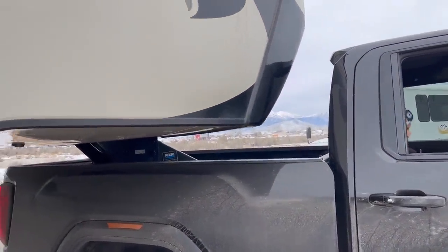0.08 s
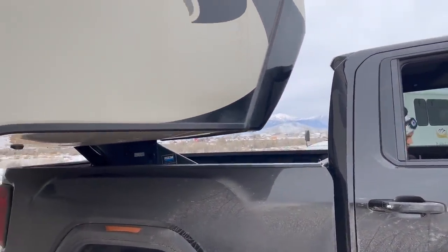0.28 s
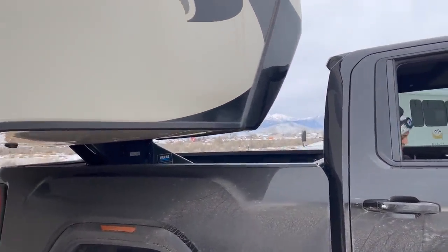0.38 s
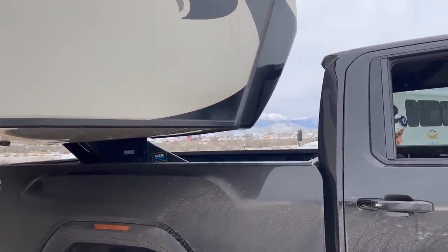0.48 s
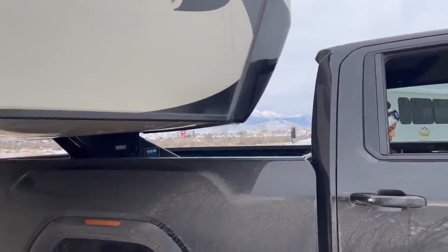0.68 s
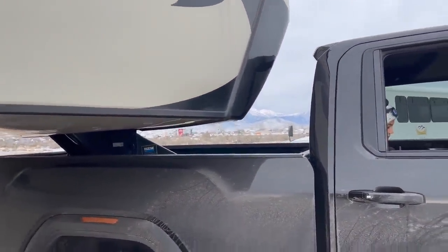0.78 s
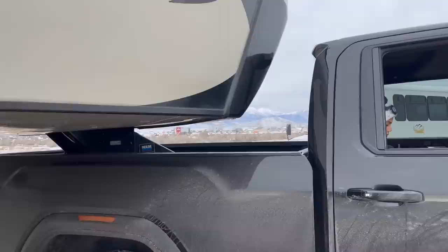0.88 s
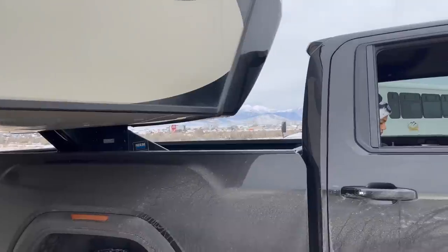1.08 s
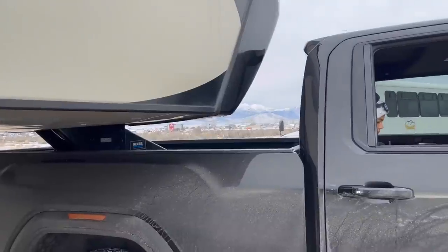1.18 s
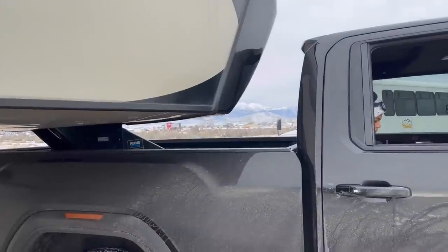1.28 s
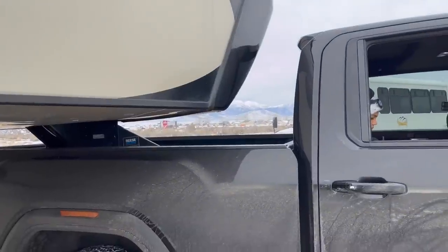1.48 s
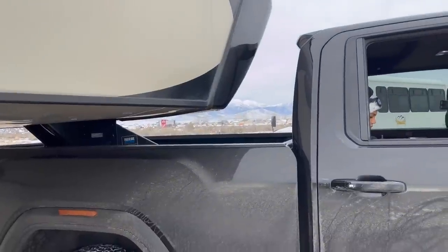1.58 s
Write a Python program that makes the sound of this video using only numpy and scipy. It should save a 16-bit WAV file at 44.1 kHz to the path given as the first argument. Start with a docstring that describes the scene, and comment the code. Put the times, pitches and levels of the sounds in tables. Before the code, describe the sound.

A diesel pickup idles close by outdoors, clattering and droning with dull regular knocks. Early on the trailer hitch clunks hard, then again more softly, booming through the truck bed; stereo phone a few metres away.

```python
"""An eight-cylinder diesel pickup creeps at idle a few metres from a phone, outdoors.
From the start the exhaust drones (wavering sines over low noise) and each firing clatters (noise bursts
over steady hiss). A loose part knocks twice per engine cycle (short damped sines). Then the trailer hitch
clunks twice, each a pair of contacts (ringing steel modes, rattle, sizzle). Each clunk booms through the
truck bed (low damped sines), echoes off the yard and leaves the trailer shuddering (low noise). Near
0.93 s the bed gives a soft third bump."""
import sys
import numpy as np
from scipy import signal
from scipy.fft import rfft, irfft, next_fast_len
from scipy.io import wavfile
from scipy.ndimage import map_coordinates

SR = 44100
rng = np.random.default_rng(int(sys.argv[2]) if len(sys.argv) > 2 else 0)


def to_wav(sig):
    """Store sig (one row per channel, or 1-D mono) as 16-bit WAV at the path in sys.argv[1].

    Samples outside -1..1 are clipped; the rate is SR.
    """
    pcm = np.clip(np.atleast_2d(sig), -1, 1) * 32767
    pcm = np.round(pcm).astype(np.int16)
    wavfile.write(sys.argv[1], SR, pcm.T)  # frames by channels


def volts_from_db(level):
    """Convert decibel levels to linear amplitude ratios."""
    exponent = np.asarray(level, float) / 20
    return 10 ** exponent


N = 72765  # samples, 1.65 s
CYCLE_HZ = 5.005  # engine cycles a second, each two crank turns


def unit(x):
    """Scale to rms 1."""
    return x / np.sqrt(np.mean(x ** 2) + 1e-20)


def along(points, hz):
    """Read a curve of (Hz, value) points on a log frequency axis."""
    f, v = np.transpose(points)
    return np.interp(np.log(hz + 1), np.log(f + 1), v)


def wobble(rate):
    """A smooth random curve with rate knots a second."""
    return map_coordinates(rng.standard_normal(100), [np.arange(N) * rate / SR])


def filtered(x, response):
    """Multiply the spectrum of x by a complex response of frequency."""
    size = next_fast_len(N + SR // 2)
    hz = np.fft.rfftfreq(size, 1 / SR)
    return irfft(rfft(x, size) * response(hz), size)[..., :N]


def noise(spectrum):
    """Two unrelated noises of one colour, rms 1."""
    return unit(filtered(rng.standard_normal((2, N)), lambda hz: volts_from_db(along(spectrum, hz))))


def firm(sound):
    """A pair whose second half is silent: a tone or ring reaches both ports alike."""
    return np.stack([sound, np.zeros_like(sound)])


def add(track, s, sound):
    """Mix a sound into a track from s seconds on."""
    part = track[..., max(round(s * SR), 0):][..., :sound.shape[-1]]
    part += sound[..., :part.shape[-1]]


def dying(t60, rise):
    """Half a second of times, and an envelope that rises and then decays."""
    t = np.arange(SR // 2) / SR
    return t, volts_from_db(-60 * t / t60) * (1 - np.exp(-t / rise))


# exhaust tones [f/Hz, level/dB rms before wavering, waver/dB]
EXHAUST_TONES = [(40.1, -49, 2), (94.8, -50, 3), (120.2, -50, 2.5), (200.3, -58, 3), (400.4, -59, 1.2)]
# swell of the drone and the whine [t/s, drone level/dB rms, whine level/dB rms before wavering]
DRONE_SWELL = [(0, -39.5, -59), (.13, -44.5, -57), (.4, -45, -55), (.8, -40.5, -51), (.88, -42, -54),
               (1.0, -32, -52), (1.11, -45, -55), (1.22, -34, -45), (1.32, -41, -50.5), (1.45, -36, -50),
               (1.65, -45.5, -50)]
# colour of the exhaust rumble [f/Hz, relative level/dB per Hz]
RUMBLE_COLOUR = [(12, -66), (20, -6), (70, -8), (122, -4.5), (167, -15), (248, -14), (349, -19.5),
                 (397, -14.5), (499, -35), (600, -16.5), (780, -65), (1320, -120)]


def exhaust():
    """Gas pulses sound as wavering tones, a swelling drone and a faint whine over a low rumble."""
    drone_hz, whine_hz = 61, 837.4
    rumble_db, rumble_waver_db = -43.5, 1.8
    t = np.arange(N) / SR

    def tone(hz, db, blur):  # blur: phase wander in radians
        phase = 2 * np.pi * (hz * t + rng.random()) + blur * wobble(11.6)
        return volts_from_db(db) * np.sqrt(2) * np.sin(phase)

    s, drone_db, whine_db = np.transpose(DRONE_SWELL)
    tones = sum(tone(hz, db + waver_db * wobble(9), 0.71) for hz, db, waver_db in EXHAUST_TONES)
    drone = tone(drone_hz, np.interp(t, s, drone_db), 0.11)
    whine = tone(whine_hz, np.interp(t, s, whine_db) + 4.6 * wobble(25.45), 1.04)
    rumble = volts_from_db(rumble_db + rumble_waver_db * wobble(13.66)) * noise(RUMBLE_COLOUR)
    return firm(tones + drone + whine) + rumble


# how hard each cylinder strikes, in firing order [level/dB before scatter]
CYLINDER_LEVELS = [3.4, 0.24, 1.3, -1.2, -4.3, 2.3, 4.3, -1.7]
# colour of the broad clatter [f/Hz, relative level/dB per Hz]
CLATTER_COLOUR = [(250, -45), (420, -9.5), (510, -16), (620, -7), (900, -0.5), (1100, -0.5), (1500, 0.5),
                  (2100, -8.5), (2900, -11), (4200, -19.5), (6000, -25.5), (7300, -31), (8000, -34.5),
                  (8700, -29.5), (10000, -28), (11300, -29), (13000, -35), (14000, -28), (14700, -39),
                  (15100, -54), (16000, -100)]
# gain of the clatter above 3.5 kHz, before its flicker [t/s, level/dB]
TREBLE_GAIN = [(0, 1.6), (.45, 1.4), (.8, -0.1), (1.65, -0.2)]
# resonances of the engine block [f/Hz, bandwidth/Hz, relative level/dB]
BLOCK_MODES = [(697, 32, -8.5), (823, 30, -4), (1014, 45, -5), (1061, 35, 3.5), (1180, 37, -5),
               (1408, 27, -3), (1663, 110, -9.5), (2080, 86, -7)]


def clatter():
    """Each firing sets off a dying noise burst, broad and through the block's modes, over steady hiss."""
    first_firing_s, jitter_s, scatter_db = 0.0072, 0.0016, 2.2
    burst_t60_s, burst_rise_s, steady_share = 0.051, 0.001, 0.75
    broad_db, block_db, flicker_db = -40, -45.5, 1.47

    firing = np.arange(int(N / SR * CYCLE_HZ * 8) + 1)
    chance = rng.standard_normal((len(firing), 2))
    at = first_firing_s + firing / CYCLE_HZ / 8 + jitter_s * chance[:, 0]
    strength_db = np.resize(CYLINDER_LEVELS, len(firing)) + scatter_db * chance[:, 1]
    blows = np.bincount((np.abs(at) * SR).astype(int), volts_from_db(strength_db), N + SR)

    t = np.arange(SR // 10) / SR
    burst = volts_from_db(-60 * t / burst_t60_s) * (1 - np.exp(-t / burst_rise_s))
    bursts = unit(signal.fftconvolve(blows, burst)[:N])
    envelope = steady_share + (1 - steady_share) * bursts
    excite = envelope * rng.standard_normal((2, 2, N))

    broad = unit(filtered(excite[0], lambda hz: volts_from_db(along(CLATTER_COLOUR, hz))))
    treble = filtered(broad, lambda hz: hz > 3500)
    treble_db = np.interp(np.arange(N) / SR, *np.transpose(TREBLE_GAIN)) + flicker_db * wobble(15.6)
    broad = broad + treble * (volts_from_db(treble_db) - 1)

    def block_response(f):
        modes = sum(volts_from_db(db) * 1j * f * width / (centre ** 2 - f ** 2 + 1j * f * width)
                    for centre, width, db in BLOCK_MODES)
        return modes * np.exp(-f / 3000)

    block = unit(filtered(excite[1], block_response))
    return volts_from_db(broad_db) * broad + volts_from_db(block_db) * block


# the knocks of one cycle [t/s into the cycle, level/dB before scatter]
KNOCK_TIMES = [(.092, -30.5), (0.149, -33.5)]
# modes of the loose part [f/Hz, relative level/dB before scatter, t60/s]
LOOSE_PART_MODES = [(200, 4.5, 0.033), (247.2, 0.5, 0.059), (302.6, -7.5, 0.077)]


def knocks():
    """A loose part is struck at the same two points of each cycle and rings dull and hollow."""
    scatter_db, rise_s = 1.3, 0.0052
    out = np.zeros(N)
    t = np.arange(SR // 8) / SR
    for cycle in range(9):
        for s, db in KNOCK_TIMES:
            chance_db = scatter_db * rng.standard_normal(4)  # the whole knock, then its modes at half
            ring = sum(volts_from_db(level + chance_db[m + 1] / 2 - 60 * t / t60) * np.sin(2 * np.pi * hz * t)
                       for m, (hz, level, t60) in enumerate(LOOSE_PART_MODES))
            knock = volts_from_db(db + chance_db[0]) * ring * (1 - np.exp(-t / rise_s))
            add(out, s + cycle / CYCLE_HZ, knock)
    return out


# hitch contacts [t/s, steel level/dB, centre of the struck pitch f/Hz, narrowness/dB per octave squared,
# sizzle level/dB before its envelope]
HITCH_CONTACTS = [(.2345, -8, 1270, 5.5, -36), (.257, -17, 1220, 3.5, -55), (.602, -19, 1180, 31, -43),
                  (0.62, -13.5, 735, 74, -44)]
# steel modes of the hitch [f/Hz, relative level/dB, t60/s]
STEEL_MODES = [(551.4, -8, 0.12), (662, -10, 0.055), (735, -13.5, 0.069), (959, -7.5, 0.064),
               (1043, -7, 0.069), (1000, 3, 0.046), (1103, -6, 0.071), (1208, -23, 0.059),
               (1248, -6.5, 0.12), (1500, -31, 0.066), (1651, -2.5, 0.061), (1905, -12.5, 0.073),
               (1962, -13, 0.064), (2470, -28, 0.051)]
# colour of the rattle before the strike shapes it [f/Hz, relative level/dB per Hz]
RATTLE_COLOUR = [(150, -30), (300, 0), (600, 0.5), (1100, 6.5), (2200, -6.5), (3000, -13), (5000, -8)]
# colour of the sizzle [f/Hz, relative level/dB per Hz]
SIZZLE_COLOUR = [(2000, -27), (3200, 1), (4800, 1.5), (6500, -4), (8000, -10), (9500, -2.5), (11500, -4),
                 (13300, -18), (13900, -43)]


def hitch():
    """Each contact rings the steel modes near where it is struck, with a rattle and a fine sizzle."""
    steel_rise_s = 0.0019
    rattle_db, rattle_t60_s, rattle_rise_s = -3.5, 0.15, 0.0011
    sizzle_t60_s, sizzle_rise_s = 0.12, 0.015
    out = np.zeros((2, N))
    for s, steel_db, struck_hz, narrow_db, sizzle_db in HITCH_CONTACTS:

        def struck_db(hz):
            return steel_db - narrow_db * np.log2((hz + 1) / struck_hz) ** 2

        for hz, db, t60 in STEEL_MODES:
            t, shape = dying(t60, steel_rise_s)
            add(out, s, firm(volts_from_db(db + struck_db(hz)) * shape * np.sin(2 * np.pi * hz * t)))
        rattle = filtered(noise(RATTLE_COLOUR), lambda hz: volts_from_db(rattle_db + struck_db(hz)))[:, :SR // 2]
        add(out, s, rattle * dying(rattle_t60_s, rattle_rise_s)[1])
        sizzle = volts_from_db(sizzle_db) * noise(SIZZLE_COLOUR)[:, :SR // 2]
        add(out, s, sizzle * dying(sizzle_t60_s, sizzle_rise_s)[1])
    return out


# low damped swings of the bed and frame: after the two clunks, and in a soft third bump near 0.93 s
# [t/s, level/dB, f/Hz, rise/s, t60/s]
BED_SWINGS = [(0.2354, -10.5, 268.2, 0.0065, 0.093), (0.2386, -18.5, 211.7, 0.0032, 0.21),
              (0.2376, -24.5, 398, 0.0021, .14), (0.251, -2, 118.3, .006, .1),
              (0.2774, -4, 61, 0.0036, 0.1), (0.3169, -12.5, 86.7, 0.0078, 0.13),
              (.3715, -20.5, 54, 0.012, 0.24), (0.6039, -18.5, 218.7, 0.0036, 0.16),
              (.604, -25, 373, 0.001, 0.095), (0.608, -31, 292.5, 0.0031, 0.22),
              (0.6258, -10, 104, 0.0022, 0.062), (0.649, -12, 54.8, 0.0079, 0.24),
              (.652, -23.5, 125.5, 0.0033, 0.26), (.735, -29, 135, 0.0073, 0.16),
              (0.928, -26.5, 223, 0.0053, 0.12), (.935, -31.5, 277.6, .01, 0.13)]


def bed():
    """The bed and frame swing low and damped after the two clunks, and in a soft bump near 0.93 s."""
    out = np.zeros(N)
    for s, db, hz, rise, t60 in BED_SWINGS:
        t, shape = dying(t60, rise)
        add(out, s, volts_from_db(db) * shape * np.sin(2 * np.pi * hz * t))
    return out


# decay of the yard's echoes [f/Hz, t60/s]
YARD_DECAY = [(100, 0.65), (1000, 0.15), (8000, 0.25)]


def yard(x):
    """Echoes off ground and vehicles: a noise tail in which each frequency dies at its own speed."""
    hz, t, grains = signal.stft(rng.standard_normal((2, SR // 2)), SR, nperseg=256)
    decay = volts_from_db(-60 * t / along(YARD_DECAY, hz)[:, None])
    tail = signal.istft(grains * decay, SR, nperseg=256)[1]
    late = np.pad(x, (400, 0))[None]  # the echoes start 9 ms behind
    return signal.fftconvolve(late, tail / np.linalg.norm(tail[0]), axes=1)[:, :N]


# shudders, one after each clunk [t/s, level/dB before the envelope, rise/s, t60/s]
SHUDDER_TAILS = [(.245, -26, 0.015, 0.49), (.607, -28.5, 0.014, 0.43)]
# colour of the shudder [f/Hz, relative level/dB per Hz]
SHUDDER_COLOUR = [(30, -35), (70, -6.5), (150, 0), (320, -7.5), (480, -13.5), (700, -45.5)]


def shudder():
    """The trailer body's panels shake on after each clunk in a rough low noise tail."""
    out = np.zeros((2, N))
    for s, db, rise, t60 in SHUDDER_TAILS:
        add(out, s, volts_from_db(db) * noise(SHUDDER_COLOUR)[:, :SR // 2] * dying(t60, rise)[1])
    return out


# likeness of the two ports for sounds that come as two unrelated noises [f/Hz, likeness 0 to 1]
PORT_LIKENESS = [(60, 0.97), (250, 1), (600, 0.94), (1200, 0.86), (2500, 0.2), (5000, 0.19), (9000, 0.25),
                 (13000, 1)]


def scene():
    """Mix all sources as a pair, a common part and a part that differs, and spread it to left and right."""
    clunks = hitch()
    echoes = volts_from_db(-11) * yard(clunks[0])
    pair = exhaust() + clatter() + firm(knocks() + bed()) + clunks + echoes + shudder()

    def spread(hz):
        angle = np.arccos(np.clip(along(PORT_LIKENESS, hz), 0, 1)) / 2
        return np.array([np.cos(angle), np.sin(angle)])

    common, apart = filtered(pair, spread)
    return np.array([common + apart, common - apart])


def band_limit(x):
    """A steep low-pass at the top of the band."""
    return signal.sosfilt(signal.butter(12, 15130, fs=SR, output="sos"), x)


# phase of the left port ahead of the right [f/Hz, lead/rad], negative where the left hears later
PORT_PHASE = [(0, 0), (520, -1.4), (1550, -3), (2240, -6.0), (4390, -5.2), (5340, -10), (6120, -7.5),
              (7240, -10.5), (7580, -10.5), (8180, -10), (8960, -11), (10600, -12.5), (13300, -13.5),
              (14700, -15.5)]
# left port over right [f/Hz, level/dB]
LEFT_OVER_RIGHT = [(40, 1.8), (125, 1), (250, 2.5), (500, -2), (1000, 1.3), (2000, 1), (4000, 2.5),
                   (8000, 0.5), (12000, -0.5)]


def record(dry):
    """Two ports a little apart, the left hearing later and at its own level, both with a low cut."""
    low_cut_hz = 24.5
    side = np.array([[0.5], [-0.5]])  # half of each difference goes to either port

    def ports(hz):
        low_cut = (1j * hz / (low_cut_hz + 1j * hz)) ** 2
        level = volts_from_db(side * along(LEFT_OVER_RIGHT, hz))
        phase = side * np.interp(hz, *np.transpose(PORT_PHASE))
        return low_cut * level * np.exp(1j * phase)

    return band_limit(filtered(dry, ports))


dry = scene()
out = record(dry)
to_wav(out)
```